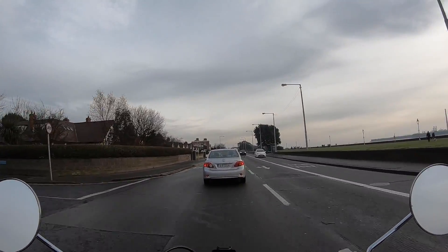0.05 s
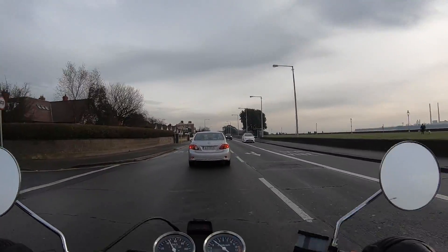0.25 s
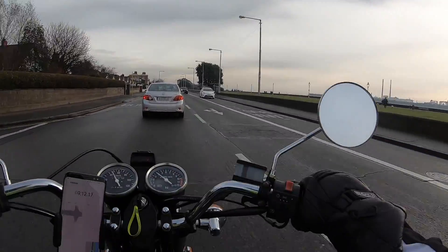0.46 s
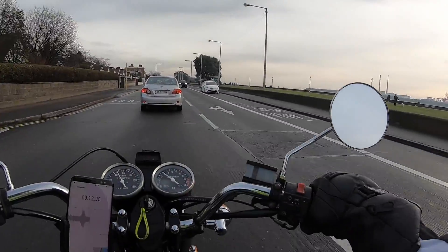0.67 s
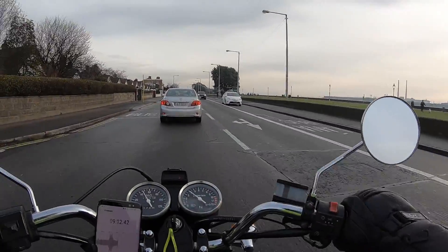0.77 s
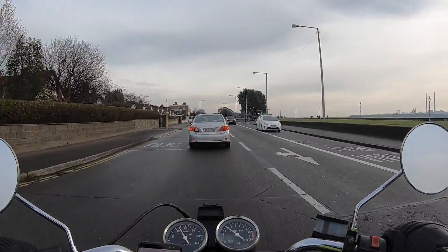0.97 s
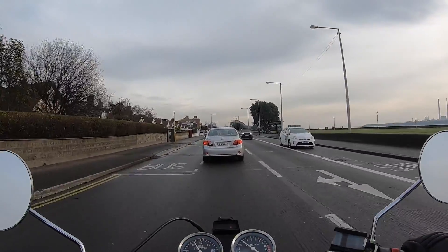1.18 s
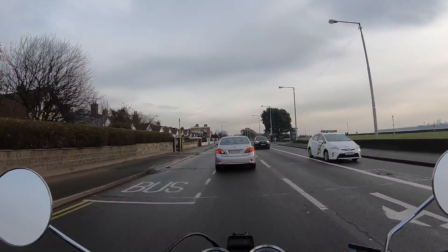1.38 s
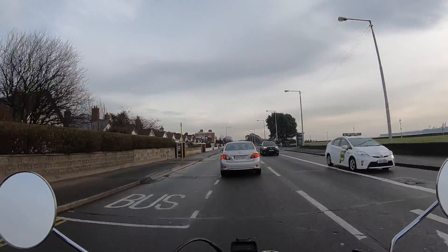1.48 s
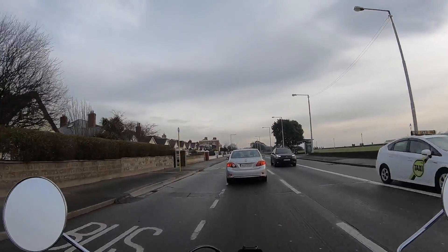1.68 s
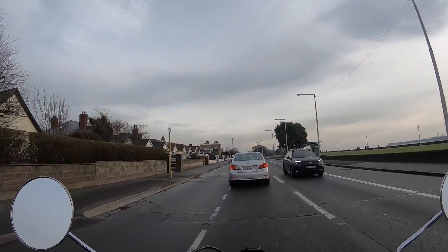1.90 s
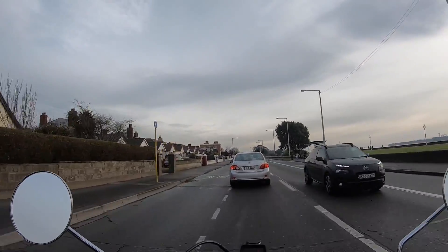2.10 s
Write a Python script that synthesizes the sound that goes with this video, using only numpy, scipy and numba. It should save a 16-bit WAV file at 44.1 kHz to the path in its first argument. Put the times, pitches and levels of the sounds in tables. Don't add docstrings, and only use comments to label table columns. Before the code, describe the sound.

A motorcycle engine throbs in a low, steady drone throughout, rising very slightly in pitch after 1.5 s. Deep wind rumble and short, uneven buffets press on the helmet microphone, easing around 0.2-0.4 s, building from 1 s and strongest after 1.9 s. Soft tyre roar on damp road gradually swells, with brief wet swishes and very faint grit ticks and valve clatter. It cuts off abruptly around 2.1 s.

```python
import sys
import numpy as np
from scipy import signal
from scipy.fft import rfft, irfft
from scipy.io import wavfile
from scipy.ndimage import uniform_filter1d
from numba import njit

SR = 44100
rng = np.random.default_rng(int(sys.argv[2]) if len(sys.argv) > 2 else 0)


def undo_db(level):
    steps = np.asarray(level, float) / 20
    return 10 ** steps


def store_wav(level_fs):
    pcm = np.round(np.clip(np.atleast_2d(level_fs), -1, 1) * 32767)
    wavfile.write(sys.argv[1], SR, pcm.T.astype(np.int16))


N = 94682

# time_s, level_db
GUST_TRACK = [
    (0.0, -22.5),
    (0.14, -25),
    (0.36, -24.5),
    (1.05, -20.5),
    (1.12, -19.5),
    (1.82, -17.5),
    (1.9, -22),
    (2.14, -11),
]
# freq_hz, density_db_per_hz
WIND_COLOUR = [(8, -14.5), (26, -8.5), (90, -4), (180, -13), (230, -17), (360, -20.5), (700, -35.5),
               (1200, -47)]
# centre_s, length_s, level_db, pitch_hz
BUFFETS = [(0.089, 0.1, -21.5, 102), (0.257, 0.16, -19.5, 79.2), (0.497, 0.21, -21, 62),
           (0.721, 0.21, -19.5, 30.5), (0.709, 0.07, -14.5, 59), (0.898, 0.075, -25.5, 71),
           (1.048, 0.11, -17, 57.86), (1.151, 0.038, -18.5, 148), (1.241, 0.11, -15, 36),
           (1.468, 0.052, -21, 60), (1.495, 0.026, -17, 39.76), (1.752, 0.2, -18.5, 31.36),
           (1.758, 0.071, -20.5, 122), (1.84, 0.042, -17, 61.8), (1.905, 0.059, -16.5, 86.3),
           (1.978, 0.0381, -12, 64), (2.054, 0.033, -9, 61.4), (2.118, 0.053, -19.5, 76.03),
           (.06, 0.063, -24.5, 62.6), (.165, 0.058, -17.5, 59.5), (.21, 0.057, -24, 143),
           (.324, 0.067, -18, 47.3), (.359, 0.071, -25.5, 170), (.357, 0.089, -32.5, 235),
           (.434, 0.06, -22.5, 63), (.469, 0.049, -27.5, 114), (.609, .08, -23.5, 48.5),
           (.893, 0.028, -26.5, 183), (.958, 0.11, -32, 47), (1.102, 0.067, -33, 111.2),
           (1.222, 0.042, -19, 79), (1.272, 0.14, -22, 111.6), (1.297, 0.036, -23, 66),
           (1.352, 0.041, -24, 66.69), (1.362, 0.066, -21, 121), (1.412, 0.11, -23, 47),
           (1.452, 0.062, -31, 128), (1.502, 0.036, -20.5, 146.2), (1.576, .09, -26, 43),
           (1.646, 0.067, -30, 100.3), (1.681, 0.059, -23.5, 146), (1.796, 0.043, -21, 65.4),
           (1.821, 0.12, -30, 26.8), (1.901, 0.022, -18.5, 150), (1.903, 0.08, -30.5, 314),
           (2, .06, -23.5, 126.5), (2.045, 0.036, -25.5, 181), (1.207, .06, -26.5, 179.4),
           (.8, 0.091, -26, 60.6), (0.388, 0.089, -35, 270)]
# time_s, level_db
TRAFFIC_TRACK = [(0.03, -42), (0.09, -40), (0.49, -37.5), (0.54, -38.5), (0.76, -38.5), (0.82, -38.5),
                 (0.86, -36.5), (0.93, -37.5), (1.39, -35.5), (1.49, -37), (1.52, -33.5), (1.54, -35.5),
                 (1.56, -35.5), (2.14, -33)]
# freq_hz, density_db_per_hz
TYRE_COLOUR = [(350, 3.5), (760, -4), (1250, -2), (1950, -10.5), (2700, -14.5), (3900, -23), (6250, -32.5),
               (6800, -47)]
# freq_hz, density_db_per_hz
AIR_COLOUR = [(6000, 3), (8000, -5.5), (11800, -4.5), (12050, -12), (15800, -12.5)]
# centre_hz, width_hz, level_db (re tyre roar)
TREAD_BANDS = [(1080, 48, -14), (1770, 49, -14), (2433, 170, -21.5), (570, 42, -12.5)]
# centre_s, level_db, pitch_hz
SPLASHES = [(0.13, -43, 690), (.278, -41, 600), (.467, -41, 615), (0.615, -46, 2400), (0.688, -38, 654),
            (0.711, -38.5, 767), (0.739, -43.5, 1700), (.763, -38, 710), (0.869, -43.5, 1555),
            (1.187, -44, 678), (1.291, -43, 1390), (1.355, -42.5, 1390), (1.522, -36.5, 1154),
            (1.571, -39.5, 684), (1.58, -40, 1970), (1.73, -48, 2260), (1.813, -38, 1228),
            (2.005, -34, 1262), (2.045, -48.5, 2534)]
# start_s, peak_db, pitch_hz
GRIT_TICKS = [(.172, -60, 5600), (.197, -60, 5800), (.2, -63, 9800), (.233, -63, 9800), (.27, -61, 5600),
              (.293, -61, 9600), (.295, -59, 5200), (.323, -61, 5600), (.483, -65, 10400),
              (.539, -63, 8400), (.57, -64, 10400), (.6774, -60, 9000), (.685, -58, 9600),
              (.712, -58, 5400), (.756, -57, 6400), (.824, -62, 10600), (.855, -62, 10800),
              (.9174, -59, 11000), (.93, -61, 10400), (.956, -57, 5800), (.957, -62, 10400),
              (1.24, -57, 5600), (1.298, -59, 11100), (1.462, -57, 5400), (1.58, -58, 6200),
              (1.7325, -58, 8800), (1.742, -60, 10400), (1.7734, -54, 5900), (1.826, -56, 5000),
              (1.856, -60, 11100), (1.882, -55, 5000), (1.984, -55, 5400), (2.008, -57, 11100),
              (2.018, -59, 11200), (2.047, -57, 11000), (2.1, -59, 11000)]
# time_s, level_db
HELMET_TRACK = [(0.03, -78), (0.29, -70), (0.37, -75), (0.78, -80.5), (0.84, -70.5), (0.93, -70.5),
                (1.05, -72), (1.17, -72), (1.9, -68.5), (2.03, -68), (2.12, -69)]
# place_cycles, level_db, scatter_db
VALVE_EVENTS = [
    (.1, .1, 1.5),
    (.42, .1, 1.5),
    (.75, -5, 1.5),
]
# freq_hz, level_db, t60_s, lean_db_per_db (gain per dB of helmet opening)
HEAD_MODES = [(8400, -3, .018, .1), (9770, -1, .011, .1), (10500, -.5, .02, -1.6), (11070, 1, .014, .9),
              (11450, -1, .014, .7), (5900, 2, .012, .1)]
# time_s, firing_hz, exhaust_db
ENGINE_TRACK = [(0, 31.12, -29.5), (.2, 31.52, -31), (.4, 31.6, -27.5), (.5, 31.63, -27.5),
                (.65, 31.69, -31), (.85, 31.79, -28.5), (1, 31.64, -30), (1.15, 31.63, -29),
                (1.3, 31.69, -29.5), (1.46, 31.66, -26), (1.6, 32.18, -29), (1.75, 32.4, -25.5),
                (1.9, 32.62, -25.5), (2, 32.93, -26), (2.14, 33.38, -29.5)]
# multiple_of_firing, level_db (re exhaust), wobble_db
EXHAUST_ORDERS = [(1, -13.5, 6), (2, -1, 2), (3, -6.5, 4), (4, -3.5, 2), (5, -1, 2.5), (6, -10, -0.5),
                  (7, -17.5, 1), (8, -15, 4), (11, -15.5, 4), (12, -28.5, 7)]

WIND_DB, GUST_SHARE_TOP = -3.5, 0.24
AIR_DB, AIR_FLICKER_DB, AIR_TOP_SHARE = 2.5, 1.1, .3
SPRAY_FROM_HZ, SPRAY_SHARE = 3500, 0.54
SPLASH_S, SPLASH_WIDTH_RATIO = .035, .6
GRIT_DB, GRIT_DECAY_S, GRIT_WIDTH_RATIO = -5, .004, .16
VALVE_DB, CLATTER_DB, CLATTER_DECAY_S = -4.5, -3, .005
PUFF_DB, PUFF_AT_CYCLES, PUFF_DECAY_CYCLES, PUFF_HZ, PUFF_WIDTH_HZ = -18, .9, .45, 560, 500
DULL_HZ, TICK_TOP_HZ = 4500, 11900
STOP_S = .004


def set_rms(x, db):
    return x * undo_db(db) / np.sqrt(np.mean(x ** 2))


def curve(table, col):
    rows = np.array(table, float)
    return np.interp(np.arange(N) / SR, rows[:, 0], rows[:, col])


@njit
def bandpass(x, hz, width_hz):
    y, band, low = np.empty(len(x)), 0., 0.
    for i in range(len(x)):
        g, k = np.tan(np.pi * hz[i] / SR), width_hz / hz[i]
        v = (band + g * (x[i] - low)) / (1 + g * (g + k))
        band, low, y[i] = 2 * v - band, low + 2 * g * v, k * v
    return y


def band_twice(x, hz, width_hz):
    centre = np.full(len(x), 1. * hz)
    return bandpass(bandpass(x, centre, 1. * width_hz), centre, 1. * width_hz)


def walk(rate_hz):
    k = int(SR / rate_hz)
    steps = np.repeat(rng.standard_normal(N // 200), k)[:N + k]
    return 0.97 * uniform_filter1d(uniform_filter1d(steps, k), k)[:N]


def bands(colour, gain_db, flicker_db, rate_hz):
    rows, f, out = np.array(colour, float), np.arange(N // 2 + 1) * SR / N + 1e-3, 0
    shape_db = np.interp(np.log(f), np.log(rows[:, 0]), rows[:, 1], left=-90, right=-90)
    noise = rfft(rng.standard_normal(N)) * undo_db(shape_db)
    noise /= np.sqrt(np.mean(irfft(noise, N) ** 2))
    for third in range(9, 43):
        part = np.clip(1 - np.abs(3 * np.log2(f) - third), 0, 1)
        gain = undo_db(gain_db(2 ** (third / 3)) + flicker_db * walk(rate_hz))
        out = out + gain * irfft(noise * part, N)
    return out


def swell_at(centre_s, length_s):
    t = np.arange(N) / SR
    return np.cos(np.pi * np.clip((t - centre_s) / length_s, -.5, .5)) ** 2


def dull(x):
    return signal.sosfilt(signal.butter(4, DULL_HZ, fs=SR, output="sos"), x)


def wind():
    gust_db = curve(GUST_TRACK, col=1)
    mean_db = gust_db.mean()

    def gain_db(hz):
        share = np.interp(np.log(hz), np.log([60, 250]), [1, GUST_SHARE_TOP])
        return WIND_DB + mean_db + share * (gust_db - mean_db)

    return bands(WIND_COLOUR, gain_db, flicker_db=1.5, rate_hz=8)


def buffets():
    t, out, drift = np.arange(N) / SR, np.zeros(N), walk(9.9)
    for centre_s, length_s, db, hz in BUFFETS:
        throb = np.sqrt(2) * np.cos(2 * np.pi * (hz * (t - centre_s) + 0.044 * drift))
        out -= undo_db(db) * swell_at(centre_s, length_s) * throb
    return out


def air(open_db):
    mean_db = open_db.mean()

    def gain_db(hz):
        share = 1 if hz < 12000 else AIR_TOP_SHARE
        return AIR_DB + mean_db + share * (open_db - mean_db)

    return bands(AIR_COLOUR, gain_db, AIR_FLICKER_DB, rate_hz=14)


def tyres(near_db, open_db):
    swell_db = .5 * walk(1.2)
    spray_db = SPRAY_SHARE * (open_db - open_db.mean() - near_db + near_db.mean())

    def gain_db(hz):
        high = np.clip(np.log2(hz / SPRAY_FROM_HZ), 0, 1)
        return near_db + swell_db + 0.13 + high * spray_db

    return bands(TYRE_COLOUR, gain_db, flicker_db=1.0, rate_hz=5.3)


def tread(near_db):
    out = np.zeros(N)
    for hz, width_hz, db in TREAD_BANDS:
        centre_hz = hz * (1 + 0.0042 * walk(6.6))
        out += set_rms(bandpass(rng.standard_normal(N), centre_hz, 1. * width_hz), db)
    return out * undo_db(near_db)


def splashes():
    out = np.zeros(N)
    for centre_s, db, hz in SPLASHES:
        hiss = band_twice(rng.standard_normal(N), hz, SPLASH_WIDTH_RATIO * hz)
        out += swell_at(centre_s, SPLASH_S) * set_rms(hiss, db)
    return out


def grit():
    t, out = np.arange(N) / SR, np.zeros(N)
    for start_s, db, hz in GRIT_TICKS:
        a = int(start_s * SR)
        since_s = t[:min(1500, N - a)]
        n = len(since_s)
        ring = bandpass(rng.standard_normal(n), np.full(n, 1. * hz), GRIT_WIDTH_RATIO * hz)
        out[a:a + n] += set_rms(ring, db + GRIT_DB) * np.exp(-since_s / GRIT_DECAY_S)
    return out


def valves(cycle, open_db):
    taps, turns = np.zeros(N), int(cycle[-1]) + 2
    for place, db, scatter_db in VALVE_EVENTS:
        size = undo_db(db + scatter_db * rng.standard_normal(turns))
        since = cycle + 1 - place
        taps += size[since.astype(int)] * np.exp(-(since % 1) / (CLATTER_DECAY_S * 32))
    taps *= rng.standard_normal(N)
    ring = np.zeros(N)
    for hz, db, t60_s, lean in HEAD_MODES:
        mode = bandpass(taps, hz * (1 + 0.0088 * walk(27)), 2.2 / t60_s)
        ring += undo_db(db + lean * (open_db - open_db.mean())) * set_rms(mode, 0)
    clatter = band_twice(taps, 9600, 4500)
    return (set_rms(ring, VALVE_DB) + set_rms(clatter, VALVE_DB + CLATTER_DB)) * undo_db(open_db)


def exhaust(cycle, load_db):
    hum = np.zeros(N)
    for k, db, wobble_db in EXHAUST_ORDERS:
        phase = k * cycle + rng.random() + 0.007 * k * walk(8)
        hum += undo_db(db + wobble_db * walk(8.62)) * np.sqrt(2) * np.sin(2 * np.pi * phase)
    puff = np.exp(-((cycle - PUFF_AT_CYCLES) % 1) / PUFF_DECAY_CYCLES) * undo_db(5.4 * walk(30))
    centre_hz = np.full(N, 1. * PUFF_HZ)
    gas = bandpass(rng.standard_normal(N), centre_hz, 1. * PUFF_WIDTH_HZ) * puff
    gas = bandpass(gas, centre_hz, 2. * PUFF_WIDTH_HZ)
    return (hum + set_rms(gas, PUFF_DB)) * undo_db(load_db)


def scene():
    cycle = np.cumsum(curve(ENGINE_TRACK, col=1)) / SR
    open_db, near_db = curve(HELMET_TRACK, col=1), curve(TRAFFIC_TRACK, col=1)
    road = tyres(near_db, open_db) + dull(tread(near_db) + splashes())
    tick_lowpass = signal.ellip(8, .5, 50, TICK_TOP_HZ, fs=SR, output="sos")
    ticks = signal.sosfilt(tick_lowpass, grit() + valves(cycle, open_db))
    engine = dull(exhaust(cycle, curve(ENGINE_TRACK, col=2)))
    return (wind() + buffets() + air(open_db) + road + ticks + engine)[None]


def low_pass(x):
    return signal.sosfilt(signal.butter(12, 15730, fs=SR, output="sos"), x)


def record(dry):
    left_s = np.arange(N, 0, -1) / SR
    stop = np.clip(left_s / STOP_S, .1, 1)
    mix = np.tanh(.3 * dry) / .3 * stop
    return low_pass(mix)


dry = scene()
out = record(dry)
store_wav(out)
```